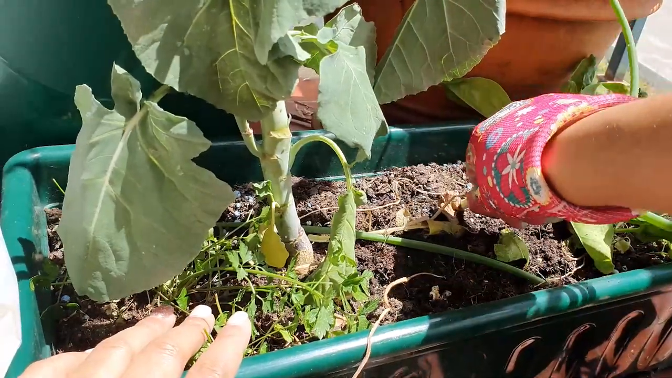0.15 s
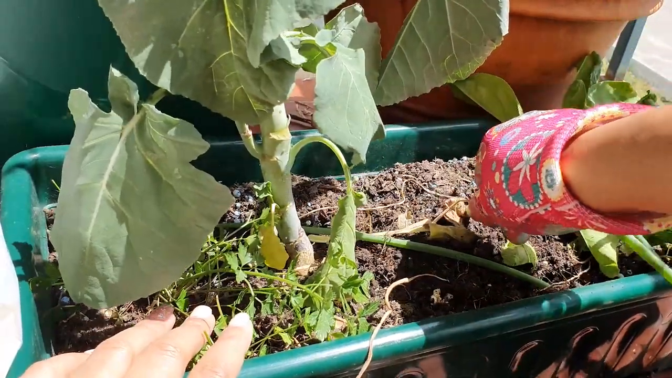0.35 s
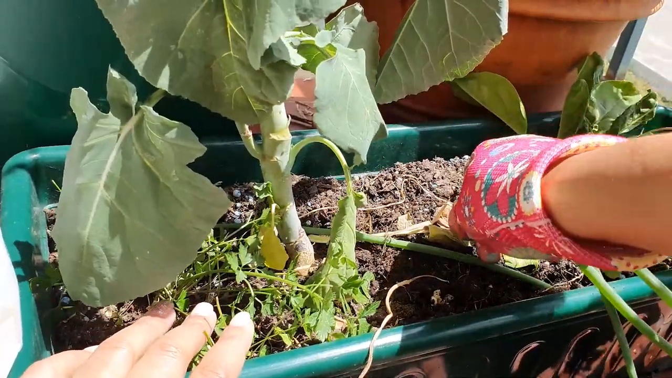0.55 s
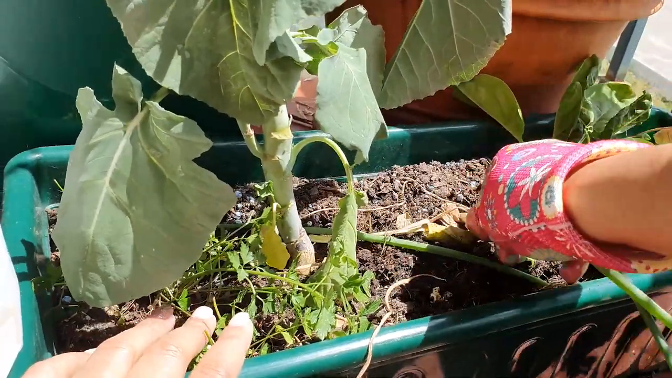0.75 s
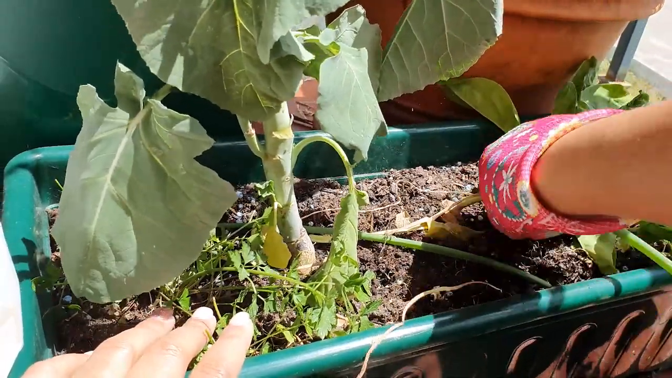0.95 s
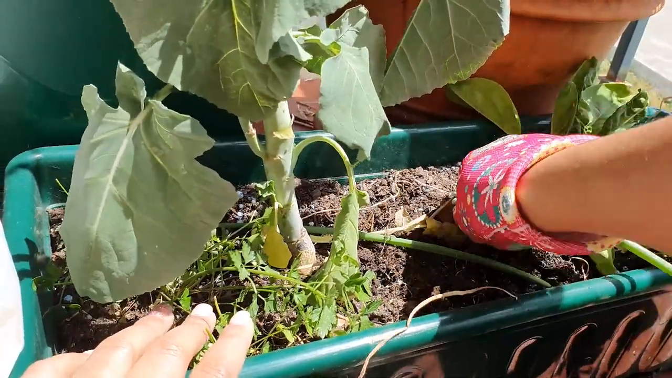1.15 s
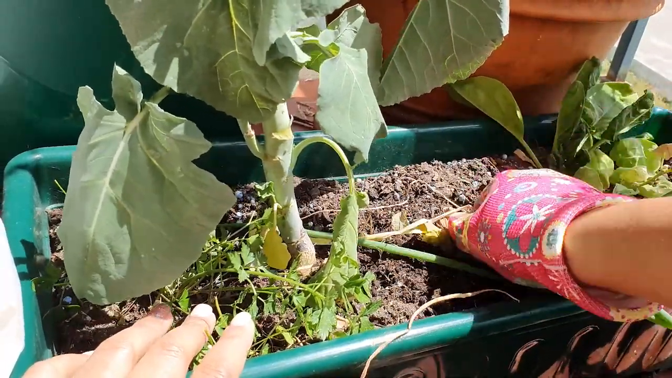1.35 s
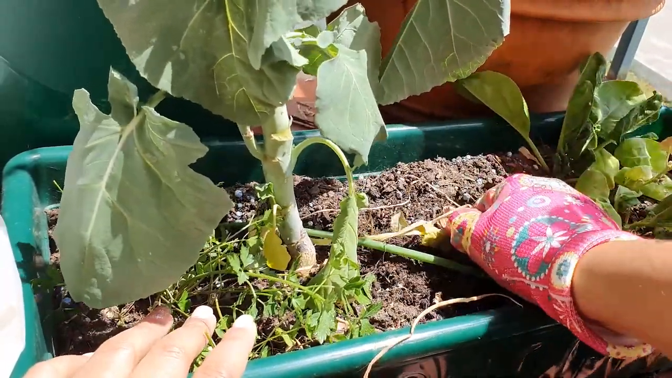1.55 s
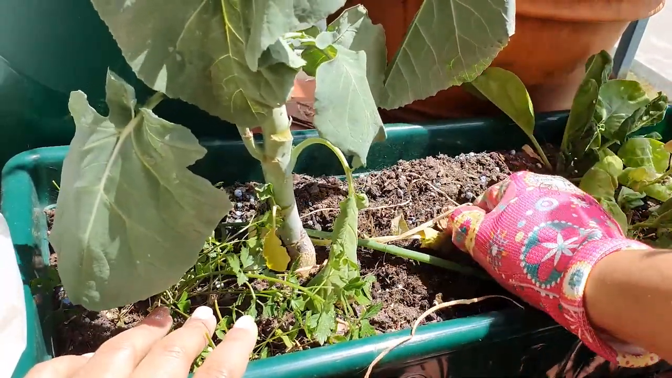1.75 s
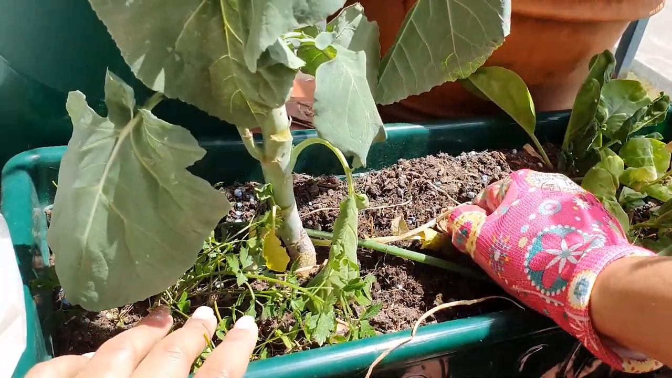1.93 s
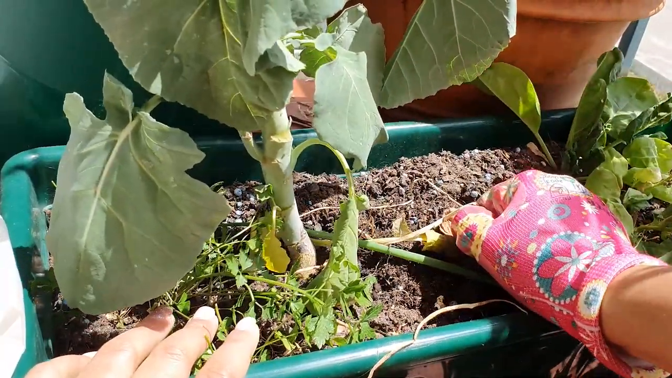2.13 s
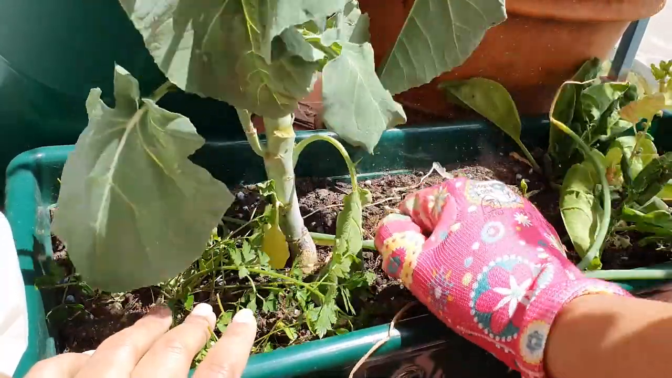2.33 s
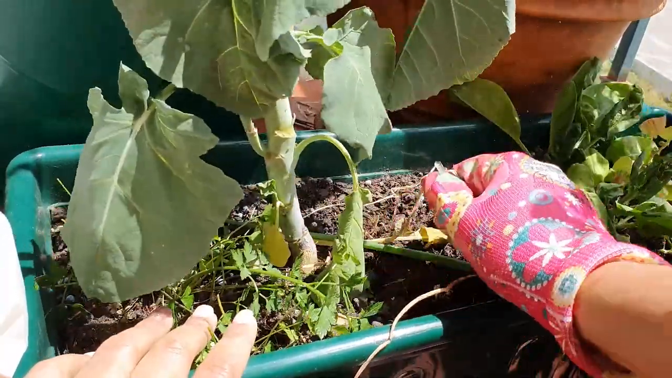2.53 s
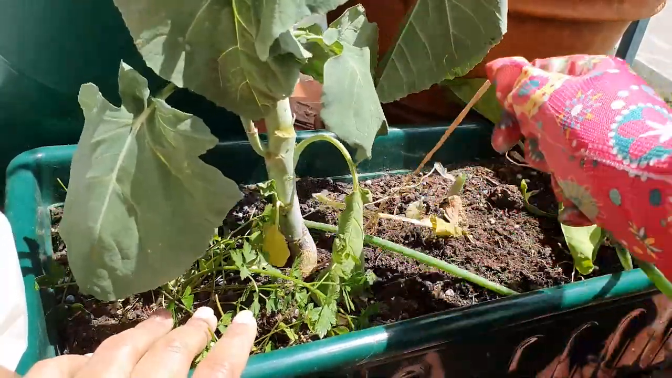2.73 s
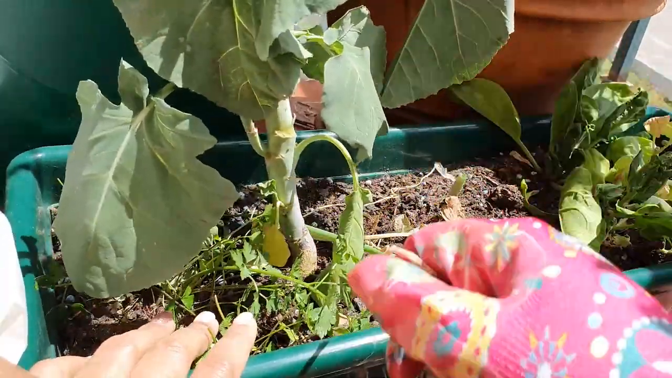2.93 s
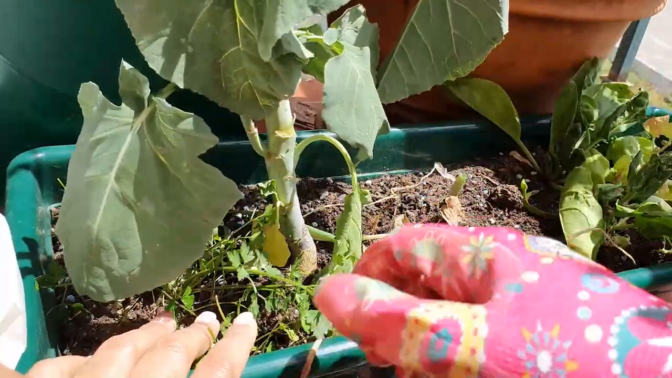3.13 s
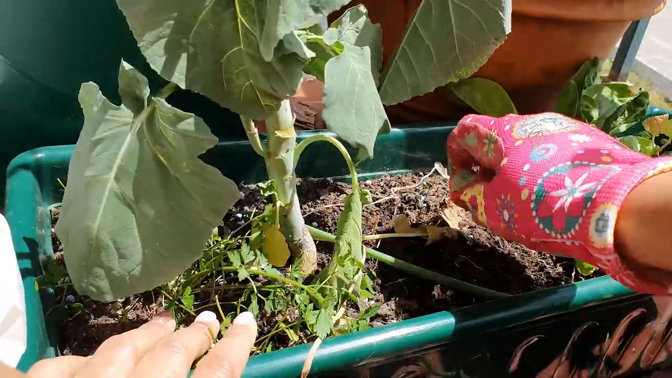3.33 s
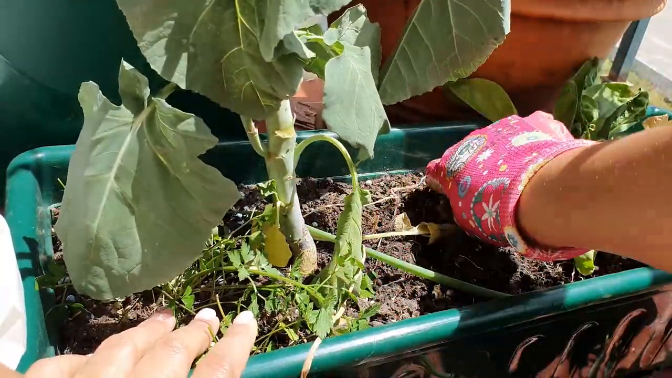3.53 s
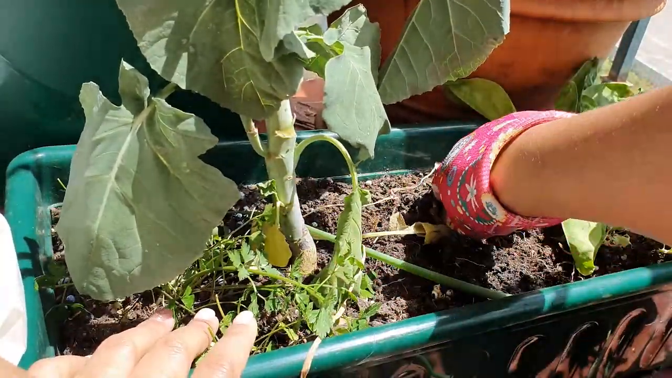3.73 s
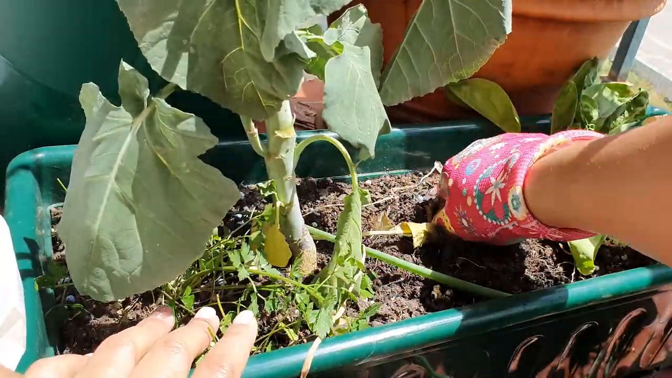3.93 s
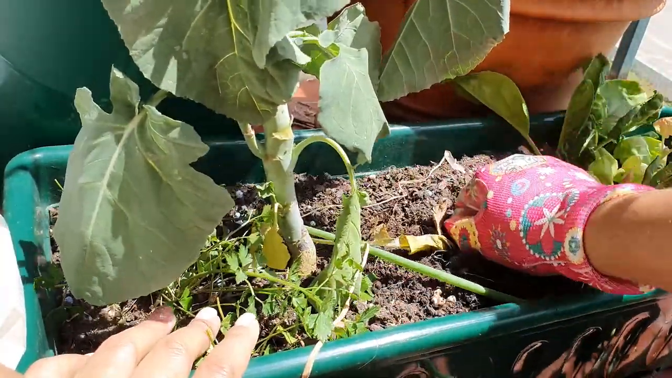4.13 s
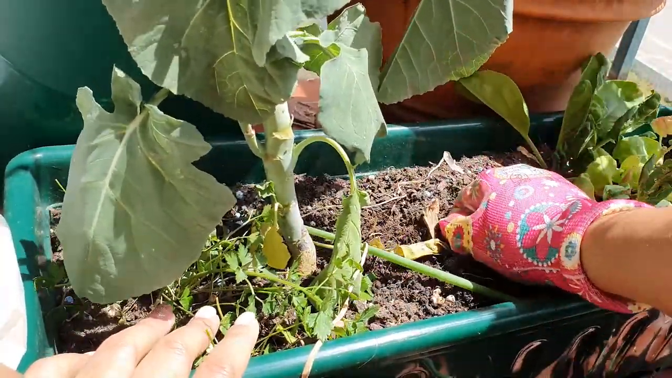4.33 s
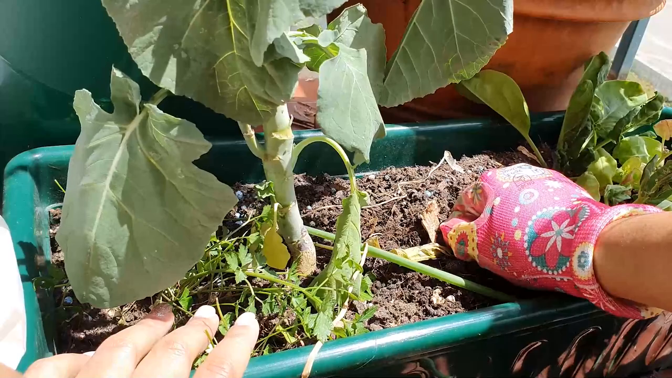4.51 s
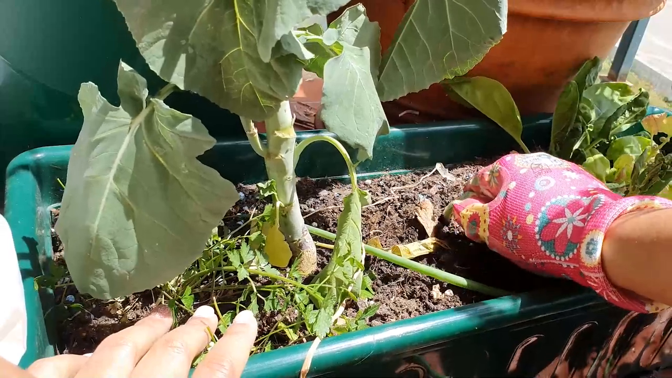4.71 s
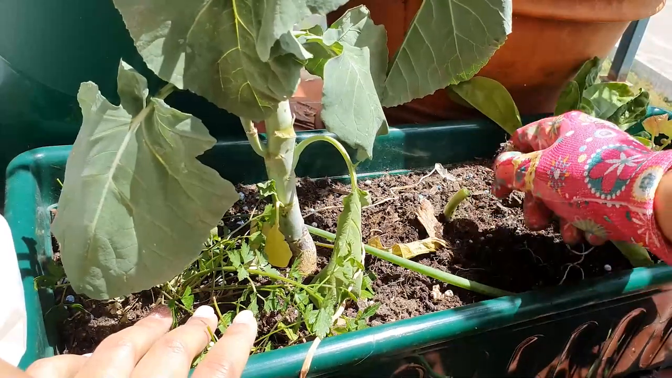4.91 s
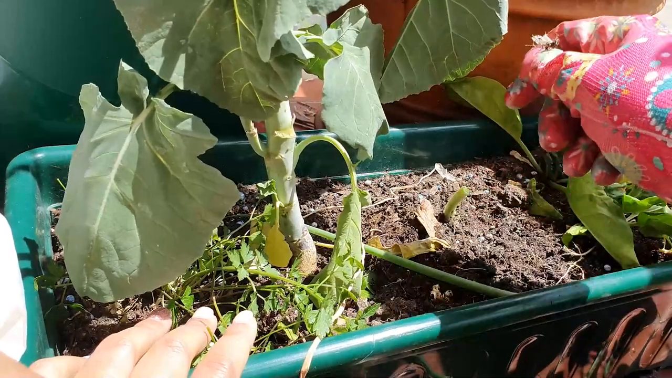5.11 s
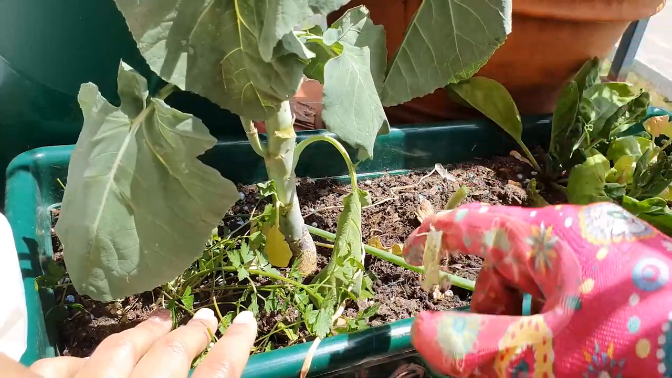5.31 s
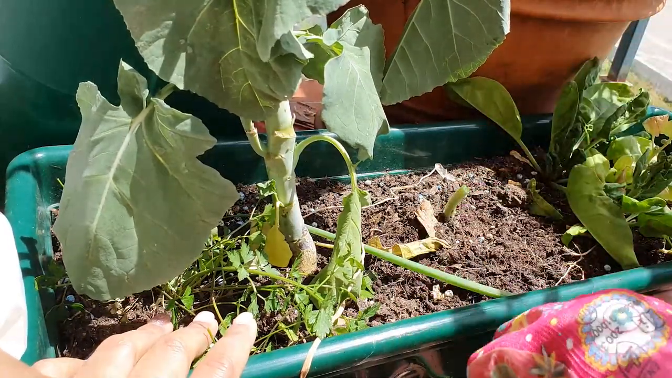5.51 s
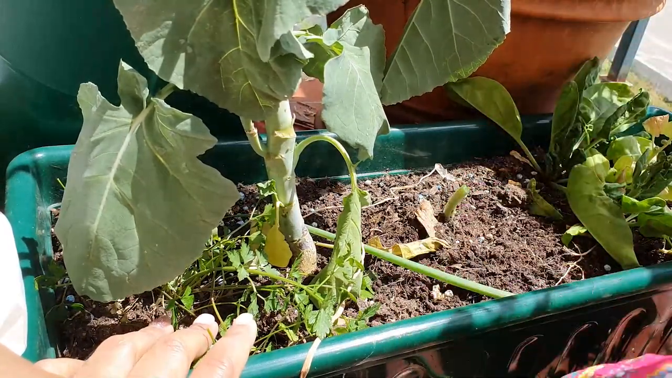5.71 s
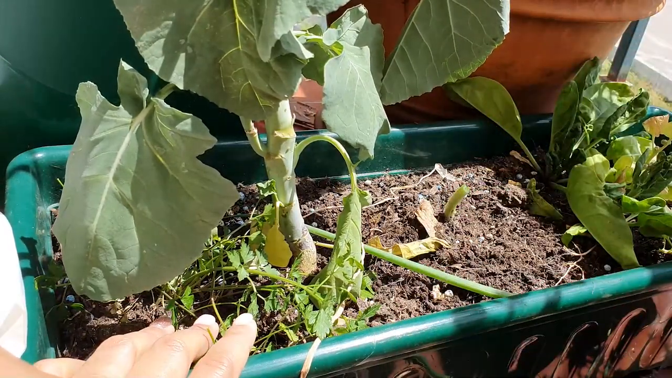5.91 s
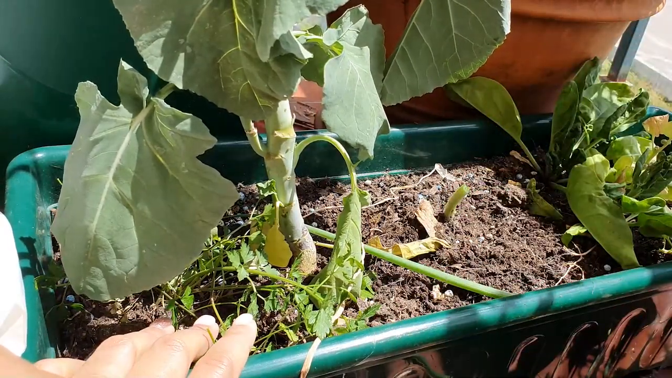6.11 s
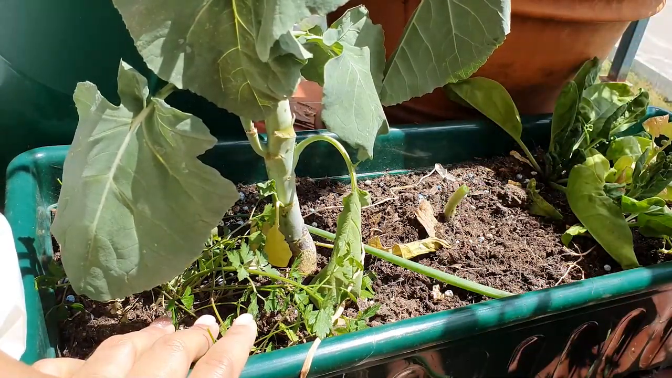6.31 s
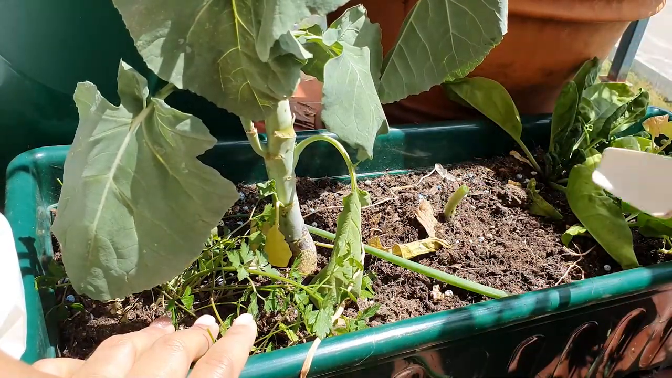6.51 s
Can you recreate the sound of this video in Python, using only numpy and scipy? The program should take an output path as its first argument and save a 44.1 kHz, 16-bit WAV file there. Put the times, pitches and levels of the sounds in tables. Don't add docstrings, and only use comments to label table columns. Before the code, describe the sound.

Close up on a patio, a gloved hand rustles dry gritty soil in a plastic planter. Small stems tick and snap, then a hard pull gives a loud cluster of cracks with a hollow trough thump. Lighter scratching and a few clicks follow. Low wind buffets the stereo microphone over a faint town hum, distant birds chirp, and a dove coos softly near the end.

```python
import sys
import numpy as np
from scipy import signal
from scipy.fft import rfft, irfft
from scipy.io import wavfile
from scipy.ndimage import uniform_filter1d

SR = 44100
rng = np.random.default_rng(int(sys.argv[2]) if len(sys.argv) > 2 else 0)


def volts(x):
    e = np.asarray(x, float) / 20
    return 10 ** e


def store_wav(level_fs):
    pcm = np.round(np.clip(np.atleast_2d(level_fs), -1, 1) * 32767)
    wavfile.write(sys.argv[1], SR, pcm.T.astype(np.int16))


N = 289296

# start t/s, length/s, firmest after/s, grit level/dB, crumb level/dB
GRABS = [(0, 0.65, 0.1, -57, -56.5), (0.397, 0.18, 0.11, -56.5, -60), (0.708, .32, 0.1, -59.5, -53),
         (2.247, 0.44, 0.087, -64.5, -57.5), (3.486, 0.28, .01, -71.5, -64), (3.742, 0.13, .01, -80, -66),
         (3.853, 0.43, .22, -68.5, -59.5), (4.548, 0.238, 0.22, -68, -56.5),
         (4.999, 0.41, 0.27, -76, -66.5), (5.498, .44, 0.036, -64, -66), (6.036, 0.63, 0.22, -70.5, -72.5)]
# start t/s, length/s, grit level/dB, crumb level/dB
DRAGS = [
    (0.562, .14, -70.5, -65.5),
    (1.025, 0.11, -76, -67.5),
    (1.109, 0.2984, -63, -61.5),
    (1.411, 0.15, -67.5, -59.5),
    (1.542, 0.6, -73.5, -64),
    (2.997, .35, -75.5, -71.5),
    (4.296, 0.45, -79, -68),
    (4.796, 0.15, -74, -65.5),
    (6.018, 0.52, -76.5, -73),
]
GRIT_SAG_DB_PER_S, CRUMB_SAG_DB_PER_S = 50, 35.5
REST_GRIT_DB, REST_CRUMB_DB = -81, -77
TOUCH_S = .03
# f/Hz, level/dB per Hz
GRIT_COLOUR = [(1470, -34), (2500, -5.5), (3830, -13), (4800, -5.5), (6760, -8.5), (8020, -14),
               (13300, -16.5), (16000, -23.5)]
# f/Hz, level/dB per Hz
CRUMB_COLOUR = [(500, -34), (900, -3.5), (1500, -10), (2100, -9.5), (2900, -7), (4500, -14.5), (7000, -47)]

# t/s, peak level/dB, left-right/dB
GUSTS = [(0, -41.5, 6), (.18, -39.5, 11), (.46, -38.5, 14), (.66, -45, 21), (.8, -32.5, 4.5),
         (1.47, -47, 11), (2.23, -35.5, 2.5), (2.48, -45, 0), (3.21, -50.5, 14), (4.42, -47, 9),
         (4.62, -47, 0.5), (5.129, -41, 16.5), (5.7, -48.5, 6), (5.94, -47, 1.5), (6.23, -55, 4),
         (6.55, -44.5, -19)]
BREEZE_DB, GUST_RISE_DB_PER_S, GUST_FALL_DB_PER_S = -52.5, 65, 57
PULL_S, SINK_S, SINK_DB, RECOVER_DB_PER_S = 2.43, 0.2, 6.5, 5.5

# t/s, peak level/dB
SWELLS = [
    (.05, -48.5),
    (.5, -51.5),
    (.81, -48.5),
    (2.3, -39.5),
    (4.19, -54.5),
    (4.7, -48),
]
TOWN_DB, SWELL_RISE_DB_PER_S, SWELL_FALL_DB_PER_S = -57.5, 75, 84.5
# f/Hz, level/dB per Hz
HUM_COLOUR = [(59, -30), (100, -23), (174, -0.5), (201, -14.5), (321, -14.5), (882, -22), (3000, -43),
              (3900, -81.5)]
# f/Hz, likeness (1 = the same)
LIKENESS = [(60, -0.5), (180, 1), (550, 0.57), (1650, -0.9), (4970, 0.38), (15000, 1.6)]

# t/s, level/dB
FLOCK = [(0, -56.5), (.66, -61), (.81, -55.5), (1.27, -75), (1.75, -63.5), (2.34, -64), (2.55, -78.5),
         (3.2, -66), (3.71, -68), (3.96, -63), (4.6, -66), (4.71, -54.5), (4.89, -70), (5.55, -73),
         (5.75, -66.5), (6.22, -64.5), (6.56, -66)]
# f/Hz, level/dB per Hz
CHORUS_COLOUR = [(2500, -32), (2900, 0.5), (3500, 1.5), (4500, 0.5), (5000, -3.5), (5600, -14.5), (7000, 2)]

# t/s, length/s, centre f/Hz, level/dB, left-right/dB
GLOVE_SCUFFS = [(0.036, .12, 575, -53.5, -26.5), (0.729, 0.076, 2390, -67, -11),
                (1.254, 0.091, 2320, -49.5, 1), (2.213, 0.04, 2670, -31.5, 3), (2.257, 0.073, 1140, -33, 0),
                (2.254, .058, 3170, -26, -1), (2.305, 0.062, 2370, -41, 1), (4.648, 0.016, 1700, -34, 8),
                (5.503, 0.029, 2450, -45, 6), (5.519, 0.078, 3720, -56, 6.5),
                (5.831, 0.11, 1510, -58.5, -1), (6.034, .16, 2130, -57.5, -2)]
# t/s, length/s, centre f/Hz, level/dB, left-right/dB
LEAF_SCUFFS = [(0.021, .13, 2700, -46, -16), (0.495, 0.026, 3570, -45.5, -14),
               (1.125, 0.24, 2260, -60.5, -11), (3.491, .24, 890, -66.5, -8), (2.226, .024, 4000, -41, 2),
               (2.278, .022, 5500, -33, 0), (3.203, .05, 4500, -57, 5), (4.669, 0.022, 2000, -44, 17),
               (5.233, 0.12, 3530, -63, -6), (5.625, 0.045, 1900, -48, 2), (5.63, 0.044, 4200, -46, 5.5),
               (6.215, 0.19, 2870, -64, -6)]
GLOVE_GRIT_DB, LEAF_GRIT_DB = -22, -3.5

# t/s, length/s, start f/Hz, end f/Hz, level/dB
CHIRPS = [(0.081, 0.042, 4210, 4560, -39), (0.54, 0.041, 4740, 4250, -47.5),
          (0.597, 0.037, 3750, 3586, -44), (1.615, 0.038, 3110, 3540, -44.5),
          (1.641, 0.036, 3880, 4290, -44), (3.343, 0.045, 3750, 3550, -50.5), (3.44, 0.03, 4150, 4500, -49),
          (3.485, 0.09, 1950, 2000, -56), (3.59, .09, 1980, 1920, -57), (3.648, 0.045, 1000, 980, -55.5),
          (0.931, 0.099, 3010, 4290, -49.5), (1.69, 0.055, 3580, 4030, -55),
          (5.526, 0.045, 4000, 3570, -55), (4.074, 0.13, 4640, 4230, -52.5),
          (4.304, 0.0516, 4260, 3930, -50.5), (4.361, 0.043, 3800, 3350, -47.5),
          (5.82, 0.016, 4700, 4800, -46), (3.418, .022, 4050, 4200, -54), (3.438, .02, 3150, 3350, -54),
          (6.43, 0.046, 3750, 3680, -54), (6.539, 0.019, 5460, 5360, -56.5),
          (6.165, 0.05, 4200, 4000, -59),
    (6.21, .06, 3500, 3200, -59),
    (6.35, .07, 4500, 4700, -61),
    (6.36, .04, 4000, 3700, -59),
]

# t/s, peak level/dB, ring f/Hz, wall level/dB, left-right/dB
BRITTLE = [(.4255, -38, 5940, -67, 1), (.4664, -38, 4570, -52, -1), (.7058, -37, 1620, -66, 2),
           (.7417, -31.5, 2460, -53, -1), (.7809, -33, 2480, -54, -8), (1.7908, -37, 3260, -72, 0),
           (1.8548, -35.5, 1610, -53, -1), (1.938, -36, 3480, -63, -2), (2.0108, -43.5, 3450, -51.5, -4),
           (2.204, -36.5, 2480, -55, -8), (2.2538, -19, 1730, -12.5, -1), (2.2887, -18, 2710, -31, 2),
           (3.1864, -47, 5100, -57, 1), (4.1325, -36, 4360, -48.5, -2.5)]
# t/s, peak level/dB, ring f/Hz, wall level/dB, left-right/dB
WOODY = [(.1749, -38.5, 4140, -48, -12), (.411, -36.5, 2880, -67, -2), (.4474, -43, 4900, -63, -13),
         (.7572, -26, 4670, -48, 5), (.7697, -29, 4650, -41, -2), (.898, -42, 2520, -48, 2),
         (1.5363, -44, 3300, -54, -3), (1.8185, -31.5, 3220, -55, 0), (2.3138, -21.5, 2110, -34.5, 7),
         (4.6535, -26, 2080, -38, -8), (4.7395, -30, 2060, -42, 3)]
# t/s, peak level/dB, ring f/Hz, wall level/dB, left-right/dB
DAMP = [(.6454, -38, 2530, -73, -4), (.7238, -33, 4770, -65, -1), (.7926, -28, 1690, -37, 4),
        (.8081, -25, 4920, -41.5, -.5), (.9264, -36, 2480, -47, 4), (2.2457, -3, 1900, -22, 2),
        (2.2775, -17, 2700, -24.5, -5.5), (5.7448, -46, 3480, -58, 5), (2.5283, -53, 2140, -59, -4),
        (2.6293, -52, 2200, -69.5, -3.5), (3.1304, -40, 4380, -75.5, -6), (3.3183, -30, 6000, -51.5, 5),
        (4.0761, -45, 3040, -53, -4), (4.2877, -54, 4160, -54, -3), (5.2605, -32.5, 3930, -54, 11)]
# t/s, peak level/dB, ring f/Hz, wall level/dB, left-right/dB
CRISP = [
    (.4945, -9, 3100, -47, 0),
    (2.2095, -3, 2830, -24, -1.5),
    (2.2697, -8, 3170, -22, -1.5),
]
# t/s, peak level/dB, ring f/Hz, wall level/dB,
# left-right/dB
BRIGHT_SNAPS = [(.922, -44, 3010, -60, 0), (1.121, -44, 1850, -60, 0), (1.262, -41, 2340, -60, 0),
                (1.293, -39, 2200, -60, 0), (1.805, -50, 6000, -70, 0), (1.96, -50, 6000, -70, 0),
                (2.023, -52, 6000, -70, 0), (2.195, -42, 2400, -55, 0), (2.2462, -24, 6000, -50, 3),
                (3.164, -48, 4500, -70, 0), (3.181, -48, 4500, -70, 0), (3.2, -23, 4430, -55, 8.5),
                (4.6705, -14, 2190, -23.5, .5), (3.281, -54, 6000, -70, 0), (4.787, -48, 6000, -70, 0)]
# crack against ring/dB, ring dies in/s, crack dies in/s, top of the crack f/Hz
BRITTLE_WAY, WOODY_WAY, DAMP_WAY = (2.5, .0021, .0016, 11000), (-4.5, .0021, .0022, 10500), (-30, .0021, .0013, 12000)
CRISP_WAY, BRIGHT_WAY = (-8, .0011, .0018, 12000), (-2, .0018, .0022, 14000)
# f/Hz, level/dB, fall by 60 dB/s
WALL = [(580, -12.5, 0.0084), (982, -1, 0.013), (1067, -10.5, 0.049), (1440, -12, 0.014),
        (1750, -3.5, 0.0085)]

# t/s, peak level/dB
KNOCKS = [(0.19, -37), (0.498, -33.5), (0.536, -33), (0.575, -34), (0.654, -41), (0.709, -45),
          (0.76, -30.5), (0.791, -11.5), (0.899, -33), (0.923, -34), (1.717, -33.5), (1.851, -38.5),
          (1.939, -34.5), (2.014, -39), (2.209, -14), (2.221, -24), (2.2545, 0), (2.271, -17.5),
          (2.282, -18.5), (2.338, -27), (2.355, -29), (4.1, -42.5), (4.667, -29.5)]
# f/Hz, level/dB, fall by 60 dB/s
TROUGH = [(198.7, -0.5, 0.068), (247, 0.5, 0.036), (319, -12.5, 0.085), (377, -3.5, 0.052),
          (430, -10, 0.015)]
KNOCK_LATE_S = .003

# t/s, length/s, start f/Hz, end f/Hz, level/dB
TRILLS = [
    (5.765, .19, 3350, 3650, -46.5),
    (5.83, .13, 4600, 4400, -55),
    (3.955, .1, 3050, 3500, -50),
    (4.045, .09, 2900, 3700, -48),
    (3.98, .08, 4500, 4800, -54),
    (4.785, .14, 4000, 4200, -46),
    (4.76, .14, 3300, 3100, -49),
    (4.795, .08, 4600, 4300, -48),
    (4.69, .08, 4900, 4700, -52),
    (4.13, .11, 4100, 4300, -51),
]
STROKES_PER_S, STROKE_RISE = 40, .22

# t/s, f/Hz, level/dB
DOVE = [
    (5.995, 425, -68),
    (6.03, 405, -64),
    (6.08, 368, -57),
    (6.11, 355, -66),
    (6.14, 378, -56),
    (6.175, 370, -64),
]
GARDEN_T60_S, GARDEN_DB = 0.4, -3.5

PORT_LAG_S = .00008
PORT_DIP_HZ, PORT_DIP_WIDTH_HZ, PORT_DIP_SHARE = 7600, 1300, .45
TOP_HZ = 15900


def rms_one(x):
    return x / np.sqrt(np.mean(x ** 2) + 1e-20)


def in_time(rows):
    s, *columns = np.transpose(rows)
    return [np.interp(np.arange(N) / SR, s, c) for c in columns]


def at_hz(points, hz):
    table = np.array(points)
    return np.interp(np.log(hz), np.log(table[:, 0] + 1), table[:, 1])


def drift(rate):
    r = np.exp(-80 * np.pi * rate / SR)
    chance = rng.standard_normal(N // 40 + 2002)
    slow = signal.lfilter([1], [1, -2 * r, r * r], chance)[2000:]
    return np.interp(np.arange(N) / 40, np.arange(len(slow)), rms_one(slow))


def band(x, low_hz, high_hz):
    edges = [low_hz, min(high_hz, .45 * SR)]
    return signal.sosfilt(signal.butter(2, edges, "band", fs=SR, output="sos"), x)


def ring(clicks, hz, t60):
    r, w = volts(-60 / (t60 * SR)), 2 * np.pi * hz / SR
    return signal.lfilter([0, np.sin(w)], [1, -2 * r * np.cos(w), r * r], clicks + 1e-18)


def sung(hz, level, wobble):
    return level * np.sin(2 * np.pi * np.cumsum(hz * (1 + wobble)) / SR)


def panned(x, pan_db):
    return x * volts(np.array([[pan_db / 2], [-pan_db / 2]]))


def near(x):
    turn = np.exp(-2j * np.pi * np.arange(N // 2 + 1) * SR / N * PORT_LAG_S)
    return np.array([irfft(rfft(x[0]) * turn, N), x[1]])


def coloured(source, spectrum, patchy_db, alike=None, count=2):
    out, edges = 0, 90 * 2 ** np.arange(0, 8, 1 / count)
    for k, (low, high) in enumerate(zip(edges, edges[1:])):
        hz = np.sqrt(low * high)
        if spectrum[0][0] < hz < spectrum[-1][0]:
            mid, side = band(source[k % 2], low, high)
            c = np.clip(at_hz(LIKENESS, hz) if alike is None else alike, -1, 1)
            gain = volts(at_hz(spectrum, hz) + patchy_db * drift(14))
            out = out + gain * (np.sqrt(1 + c) * mid + np.sqrt(1 - c) * side * [[1], [-1]])
    return rms_one(out)


def humps(rows, rise_db_per_s, fall_db_per_s):
    table = np.array(rows)
    late = np.arange(N) / SR - table[:, :1]
    return volts(table[:, 1:2] + np.minimum(rise_db_per_s * late, -fall_db_per_s * late)) ** 2


def sunk():
    late = np.arange(N) / SR - PULL_S
    sinking, recovering = SINK_DB * late / SINK_S, SINK_DB - RECOVER_DB_PER_S * (late - SINK_S)
    return volts(-np.clip(np.minimum(sinking, recovering), 0, None))


def touch():
    t, out = np.arange(N) / SR, np.array([[REST_GRIT_DB], [REST_CRUMB_DB]]) * np.ones(N)
    sag = np.array([[GRIT_SAG_DB_PER_S], [CRUMB_SAG_DB_PER_S]])
    for s, length, *rest in GRABS + DRAGS:
        part = slice(round(s * SR), round((s + length) * SR))
        away = np.abs(t[part] - s - rest[0]) if len(rest) == 3 else 0
        out[:, part] = np.maximum(out[:, part], np.array(rest[-2:])[:, None] - sag * away)
    return uniform_filter1d(out, size=round(TOUCH_S * SR))


def grains(per_s, spread_db, clump_db, hiss, bite):
    born = rng.random(N) < per_s * volts(clump_db * drift(25)) / SR
    sizes = volts(spread_db * np.minimum(rng.exponential(1, N), 4)) * born
    spread = signal.lfilter([1], [1, -.85], sizes)
    return rng.standard_normal((2, 2, N)) * (hiss + 1 - bite + bite * rms_one(spread))


def rustle():
    grit_db, crumb_db = touch()
    firm = np.clip((grit_db + 79) / 12, .35, 1.35)
    fine = grains(700., spread_db=3.2, clump_db=3., hiss=1.1, bite=firm)
    grit = coloured(fine, GRIT_COLOUR, patchy_db=1., alike=.2)
    coarse = grains(300., spread_db=4., clump_db=3., hiss=1.5, bite=firm)
    crumbs = coloured(coarse, CRUMB_COLOUR, patchy_db=1.5, alike=.3)
    dull = signal.sosfiltfilt(signal.butter(3, 12000, fs=SR, output="sos"), grit)
    bright = np.clip((grit_db + 82) / 12, 0, 1)
    grit = dull + bright * (grit - dull)
    return panned(volts(grit_db + 10.0) * grit + volts(crumb_db + 4.5) * crumbs, 0.84)


def wind():
    lean = volts(np.array(GUSTS)[:, 2] * [[1], [-1]])
    gusts = lean @ humps(GUSTS, GUST_RISE_DB_PER_S, GUST_FALL_DB_PER_S)
    power = gusts + (volts(BREEZE_DB) * sunk()) ** 2
    shared, apart = rng.standard_normal(N), rng.standard_normal((2, N))
    lumps = volts(4.5 * np.array([drift(53), drift(54)]))
    rumble = band((0.78 * shared + 0.72 * apart) * lumps, 43, 88)
    return volts(-2.0) * np.sqrt(power) * rms_one(band(rumble, 33, 280))


def town_hum():
    swells = humps(SWELLS, SWELL_RISE_DB_PER_S, SWELL_FALL_DB_PER_S).sum(axis=0)
    power = swells + (volts(TOWN_DB) * sunk()) ** 2
    return volts(1.0) * np.sqrt(power) * coloured(rng.standard_normal((2, 2, N)), HUM_COLOUR, patchy_db=.8)


def chorus(chorus_db):
    blur = coloured(rng.standard_normal((2, 2, N)), CHORUS_COLOUR, patchy_db=2., count=5)
    return volts(chorus_db + 2.5) * blur


def flock(level):
    voices = 0
    for centre_hz in (3400, 4000, 4600):
        snatches = np.maximum(drift(12) - .3, 0)
        hz = centre_hz * (1 + .07 * drift(15))
        voices = voices + sung(hz, level * snatches, .03 * drift(200))
    return voices


def scuffs():
    out = np.zeros((2, N))
    rows = [(*row, GLOVE_GRIT_DB) for row in GLOVE_SCUFFS] + [(*row, LEAF_GRIT_DB) for row in LEAF_SCUFFS]
    for s, length, hz, level_db, pan_db, grit_db in rows:
        at, size = round(s * SR), round(length * SR)
        ragged = rng.standard_normal(SR // 4) * (.4 + 2.5 * (rng.random(SR // 4) < .06))
        noise = (ragged + .6 * rng.standard_normal((2, SR // 4)))[:, :size]
        swell = np.sin(np.pi * np.linspace(0, 1, size) ** .7)
        body = volts(level_db) * rms_one(band(noise, hz * 0.63, hz * 1.7))
        grit = volts(level_db + grit_db) * rms_one(band(noise, 3300, 11500))
        out[:, at:at + size] += panned(swell * (body + grit), pan_db)
    return out


def chirps():
    t, out = np.arange(N) / SR, np.zeros(N)
    waver, flutter = .048 * drift(220), volts(4.5 * drift(110))
    for s, length, start_hz, end_hz, level_db in CHIRPS:
        part = slice(round(s * SR), min(N, round((s + length) * SR)))
        phase = (t[part] - s) / length
        level = volts(level_db) * np.sin(np.pi * phase) * flutter[part]
        out[part] += sung(start_hz + (end_hz - start_hz) * phase, level, waver[part])
    return out


def snaps():
    kinds = [(BRITTLE, BRITTLE_WAY), (WOODY, WOODY_WAY), (DAMP, DAMP_WAY), (CRISP, CRISP_WAY), (BRIGHT_SNAPS, BRIGHT_WAY)]
    rows, size = [(*row, *way) for table, way in kinds for row in table], 4096
    t, out = np.arange(size) / SR, np.zeros((2, N + size))
    strengths = rng.normal(0, 1.0, (len(rows), len(WALL)))
    for row, own in zip(rows, strengths):
        s, peak_db, hz, wall_db, pan_db, crack_db, ring_s, crack_s, top_hz = row
        shared, apart = rng.standard_normal(size), rng.standard_normal((2, size))
        noise = 0.1 * shared + .5 * apart
        burst = noise * (np.exp(-t / ring_s) + 0.19 * np.exp(-t / 0.0062))
        body = band(burst, hz * 0.74, hz * 1.4) + 0.037 * ring(burst, hz, 0.014)
        body = volts(peak_db - 1.0) * body / np.abs(body).max()
        crack = band(noise * (np.exp(-t / crack_s) + 0.11 * np.exp(-t / 0.013)), 3800, top_hz)
        crack = volts(peak_db + crack_db) * crack / np.abs(crack).max()
        blow = shared * np.exp(-t / 0.00206)
        tap = sum(volts(db + d) * ring(blow, f, t60) for (f, db, t60), d in zip(WALL, own))
        tap = volts(wall_db + 7) * tap / np.abs(tap).max()
        at = round(s * SR)
        out[:, at:at + size] += panned(body + crack + tap, pan_db)
    return out[:, :N]


def knocks():
    at, out = [round((s + KNOCK_LATE_S) * SR) for s, db in KNOCKS], 0
    strengths = rng.normal(0, 2.0, (len(at), len(TROUGH)))
    fading = np.exp(-1 / (.05 * SR))
    for k, ((hz, level_db, t60), own) in enumerate(zip(TROUGH, strengths.T)):
        clicks = np.zeros(N)
        clicks[at] = volts(np.array(KNOCKS)[:, 1] + level_db - 6.5 + own)
        settling = volts(-41) * signal.lfilter([1], [1, -fading], clicks) * rng.standard_normal(N)
        out = out + panned(ring(clicks + settling, hz, t60), 1.5 - .5 * k ** 2)
    return band(out, 150, 500)


def trills():
    t, out = np.arange(N) / SR, np.zeros(N)
    uneven, waver = volts(2.5 * drift(30)), .045 * drift(200)
    for s, length, start_hz, end_hz, level_db in TRILLS:
        part = slice(round(s * SR), round((s + length) * SR))
        phase = (t[part] - s) / length
        stroke = (t[part] - s) * STROKES_PER_S % 1
        hz = (start_hz + (end_hz - start_hz) * phase) * (1 + STROKE_RISE * (stroke - .5))
        level = volts(level_db) * np.sqrt(np.abs(np.sin(np.pi * phase))) * np.sin(np.pi * stroke) ** 2
        out[part] += sung(hz, level * uneven[part], waver[part])
    return out


def dove():
    t = np.arange(N) / SR
    coo_hz, coo_db = in_time(DOVE)
    fade = np.clip(np.minimum(t - DOVE[0][0], DOVE[-1][0] - t) / 0.013, 0, 1)
    return sung(coo_hz, volts(coo_db + 9.0) * fade, 0.0119 * drift(37))


def garden(small_birds, coo):
    t = np.arange(SR // 3) / SR
    tail = rng.standard_normal((2, SR // 3)) * volts(-60 * t / GARDEN_T60_S)
    tail = volts(GARDEN_DB) * tail / np.sqrt(np.sum(tail[0] ** 2))
    echoes = signal.fftconvolve((small_birds + 0.85 * coo)[None], tail)[:, :N]
    return 0.53 * small_birds + coo + echoes


def scene():
    hand = near(rustle() + scuffs() + snaps())
    chorus_db, = in_time(FLOCK)
    small_birds = flock(volts(chorus_db - 5)) + chirps() + trills()
    return hand + knocks() + wind() + town_hum() + chorus(chorus_db) + garden(small_birds, dove())


def low_pass(x):
    return signal.sosfilt(signal.butter(12, 16650, fs=SR, output="sos"), x)


def record(dry):
    b, a = signal.iirpeak(PORT_DIP_HZ, PORT_DIP_HZ / PORT_DIP_WIDTH_HZ, fs=SR)
    heard = dry - PORT_DIP_SHARE * signal.lfilter(b, a, dry)
    heard = signal.sosfilt(signal.cheby2(10, 50, TOP_HZ + 700, fs=SR, output="sos"), heard)
    return low_pass(1.416 * np.tanh(heard / 1.188))


dry = scene()
out = record(dry)
store_wav(out)
```